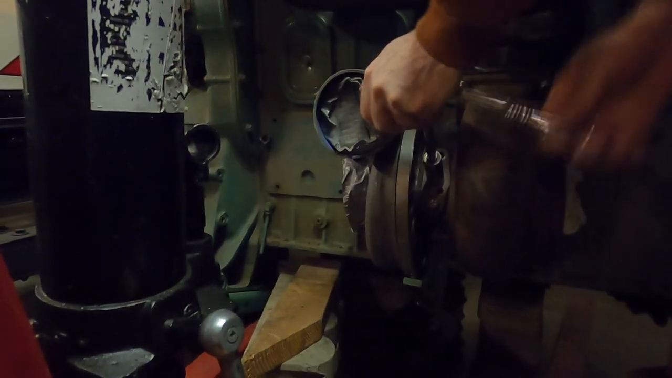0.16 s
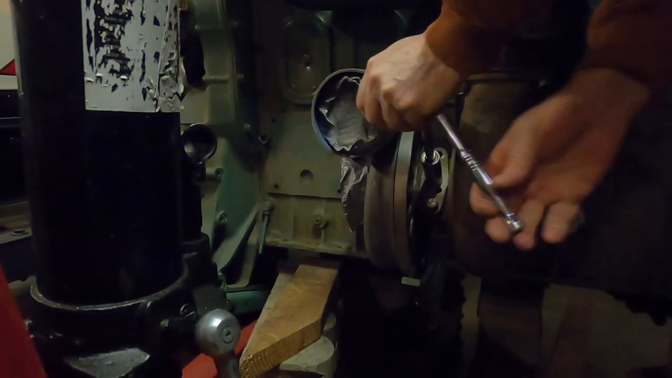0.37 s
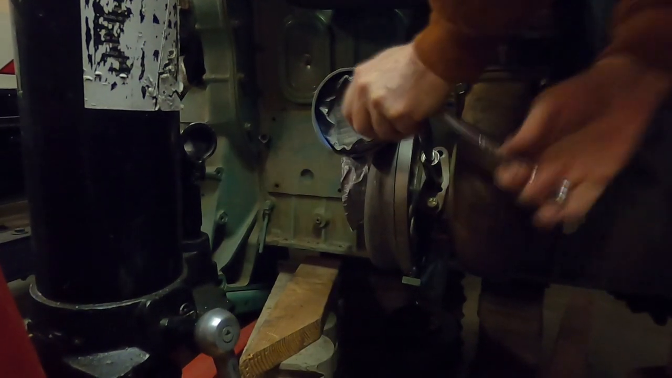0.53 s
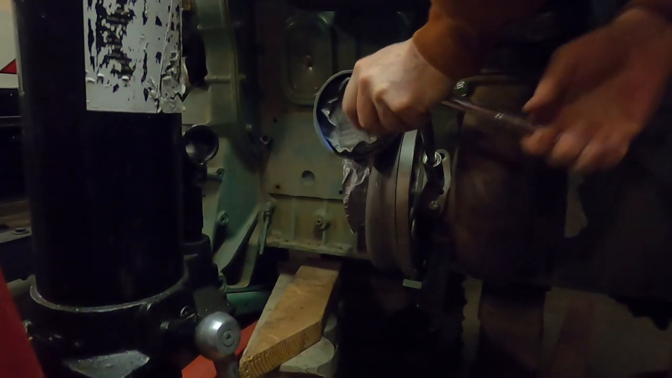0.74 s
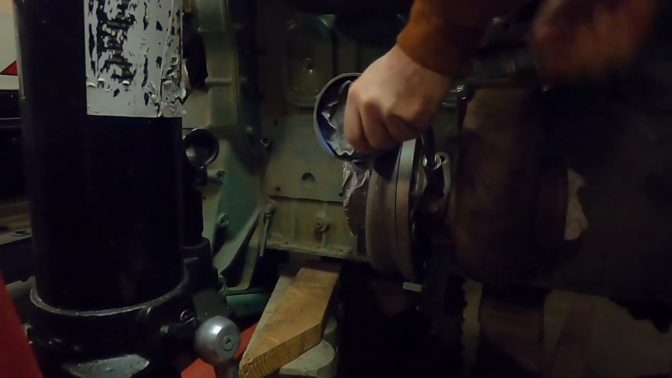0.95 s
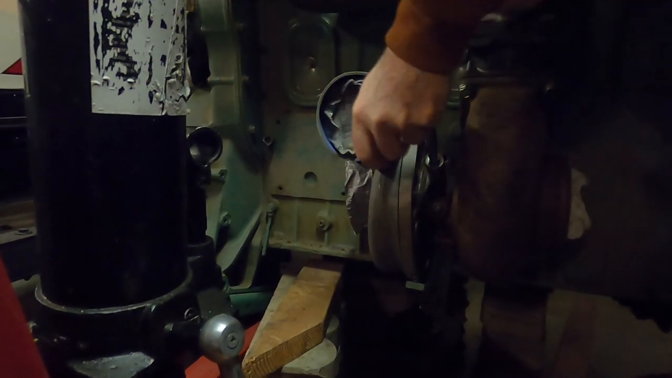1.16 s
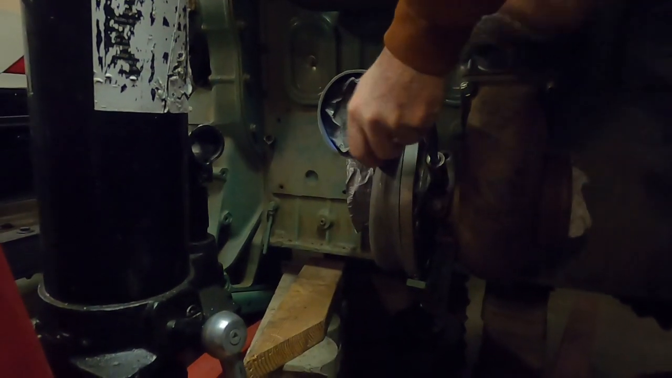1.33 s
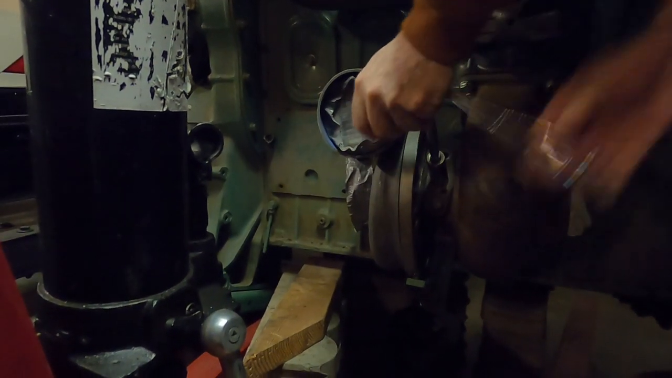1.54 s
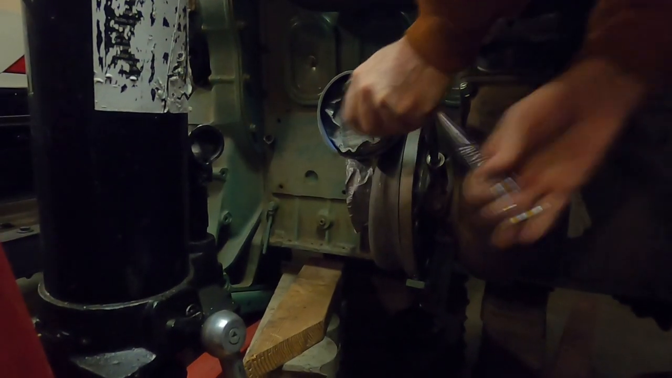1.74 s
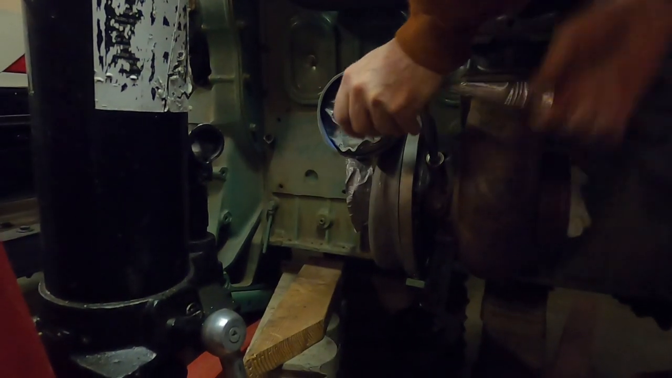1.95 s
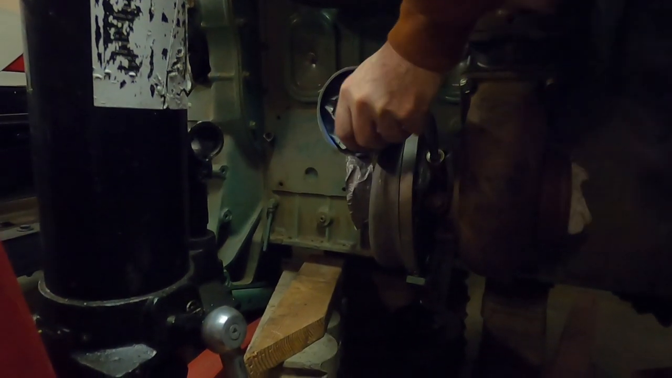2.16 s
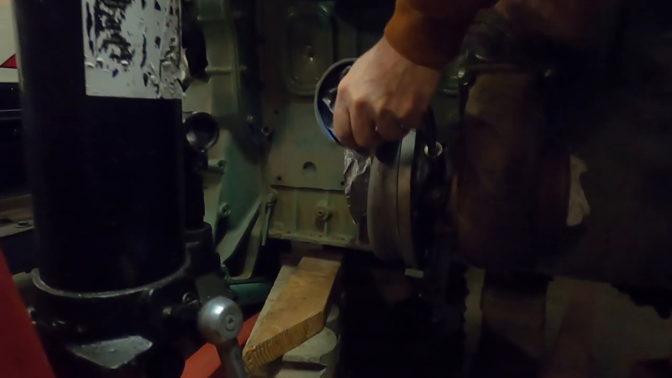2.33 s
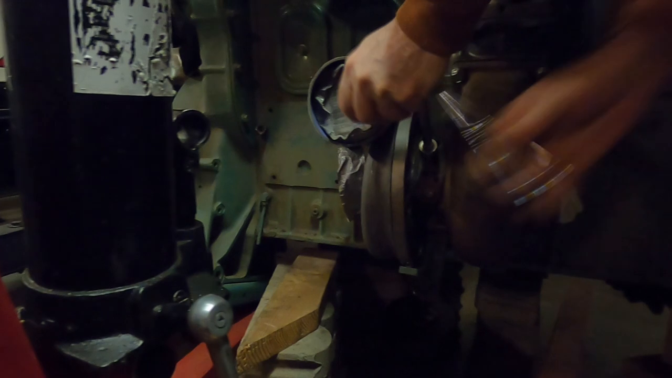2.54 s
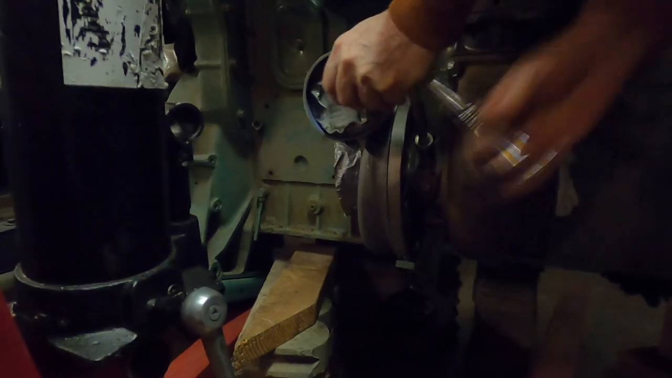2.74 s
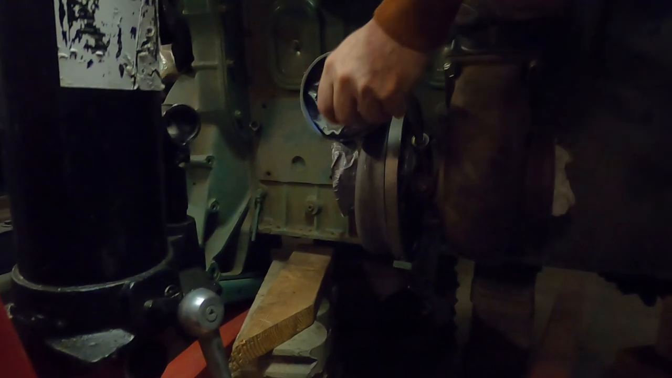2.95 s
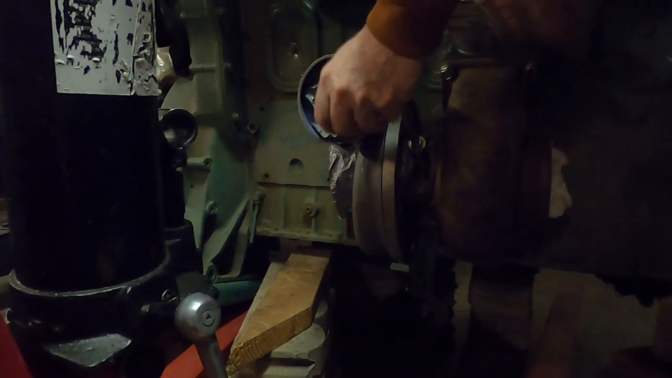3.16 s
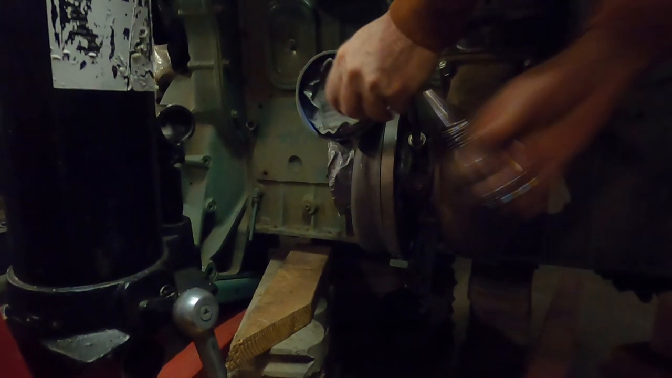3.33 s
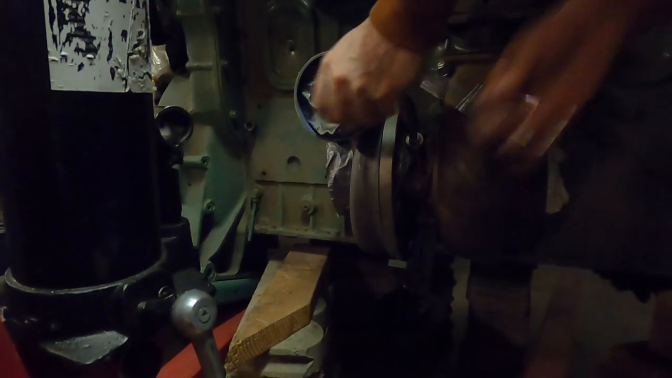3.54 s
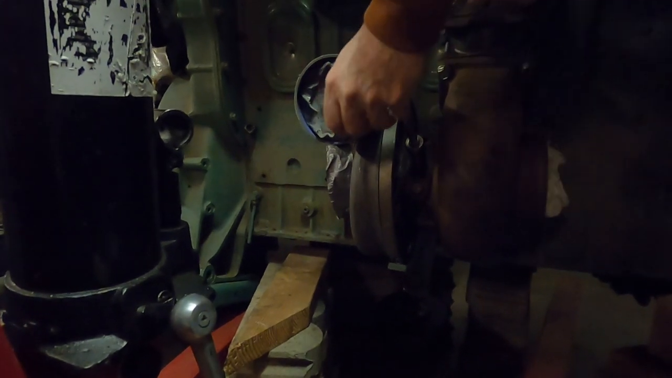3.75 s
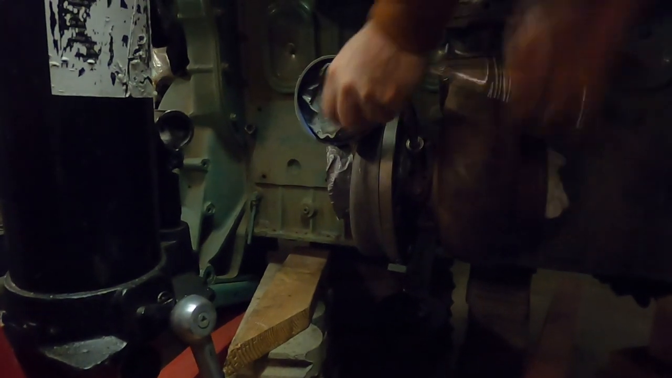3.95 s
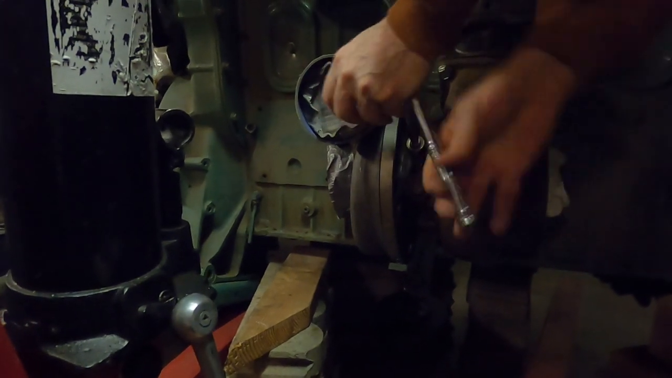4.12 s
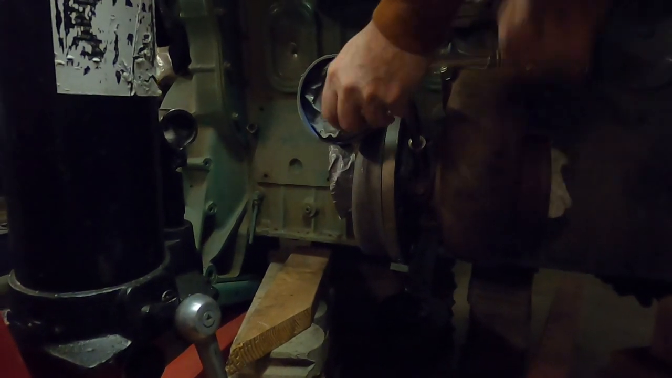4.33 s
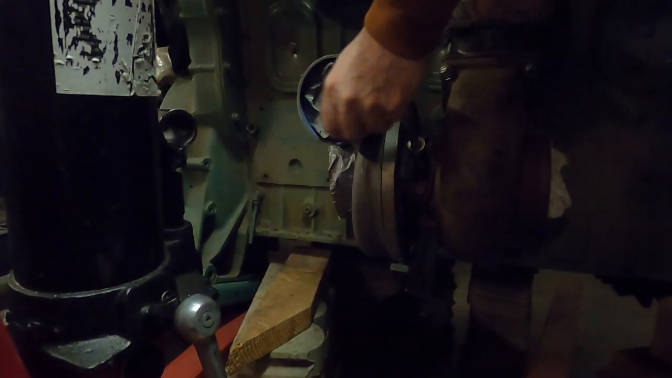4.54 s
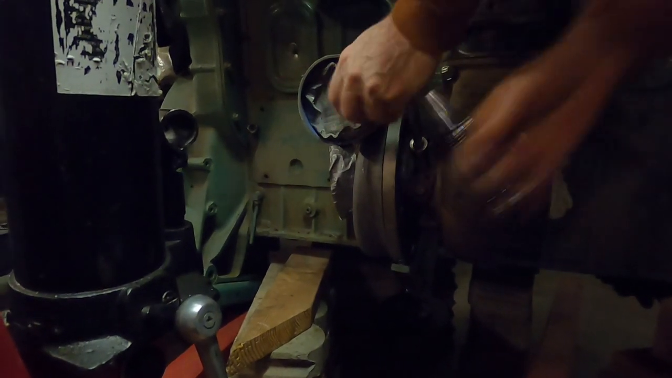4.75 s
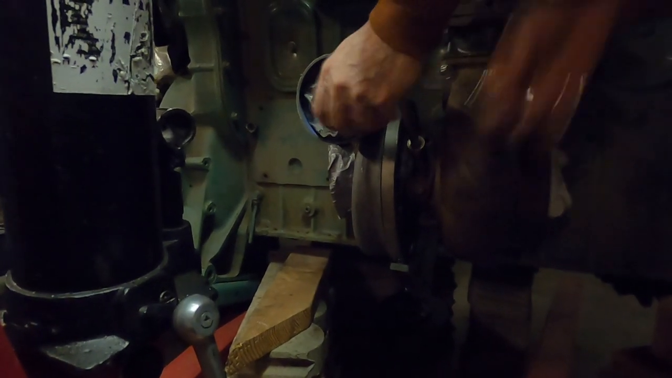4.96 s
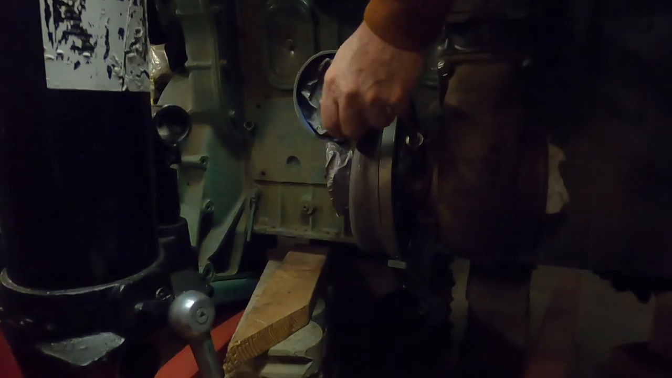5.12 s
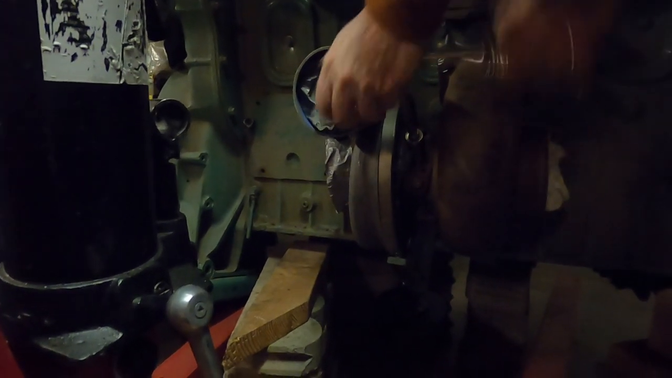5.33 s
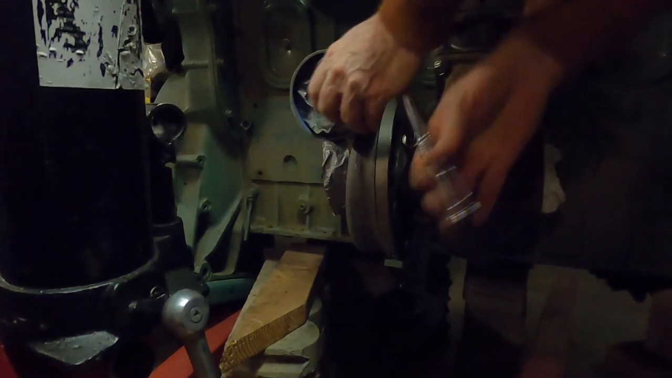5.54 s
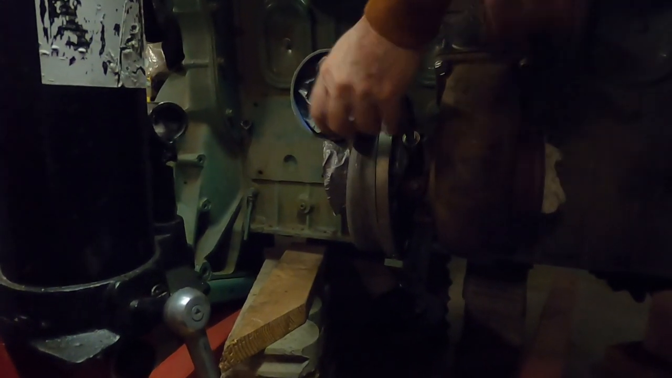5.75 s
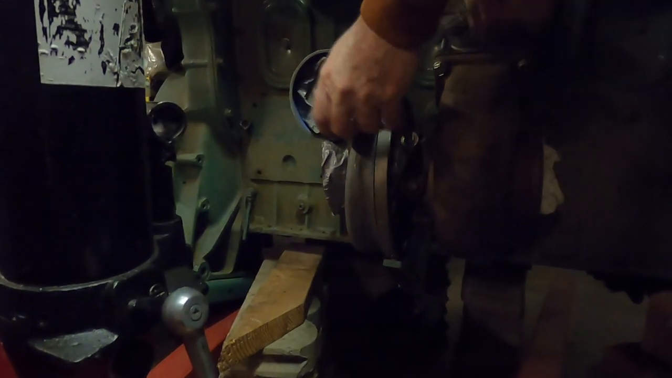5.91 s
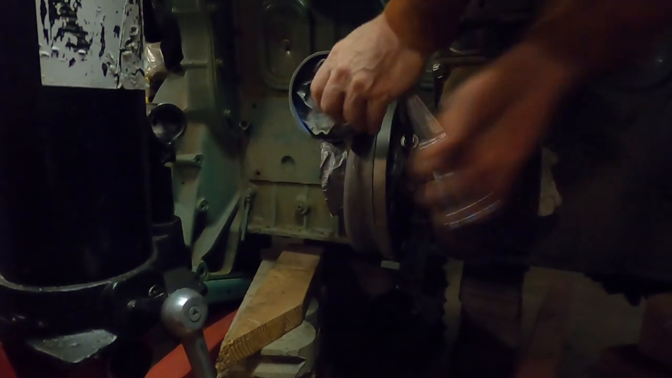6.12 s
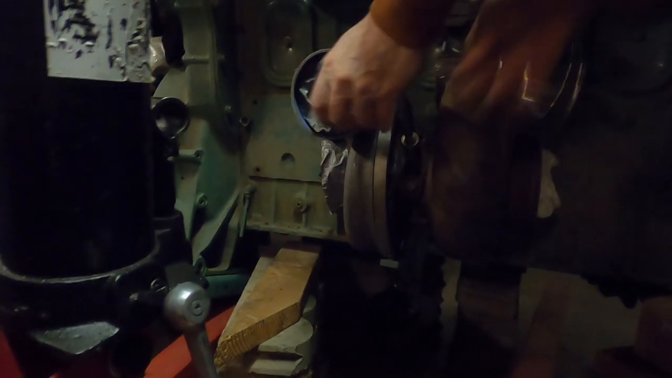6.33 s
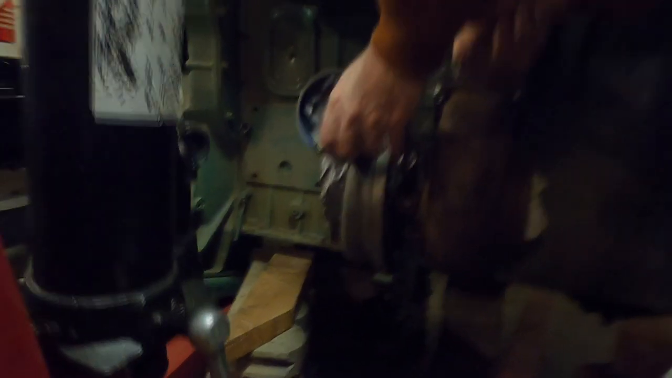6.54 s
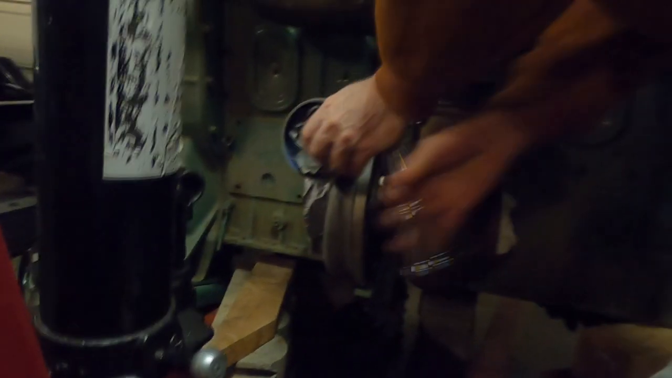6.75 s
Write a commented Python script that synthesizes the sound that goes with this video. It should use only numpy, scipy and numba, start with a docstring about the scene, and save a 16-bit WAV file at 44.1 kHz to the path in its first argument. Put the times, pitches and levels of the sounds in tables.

```python
"""A small workshop: a ratchet wrench swings to and fro on a bolt in an engine block, an arm's length
from a two-port microphone. The pawl clicks over gear teeth: decaying sines ring shaft and casting, noise
bursts give head ring, scrape, snap and rattle. Knocks and dull bumps ring casting and low modes.
Sleeves rustle as swelling noise; a far motor is noise in harmonic bands; air hisses; the room echoes."""
import sys
import numpy as np
from scipy import signal
from scipy.fft import rfft, irfft, next_fast_len
from scipy.io import wavfile
from scipy.ndimage import uniform_filter1d
from numba import njit

SR = 44100
rng = np.random.default_rng(int(sys.argv[2]) if len(sys.argv) > 2 else 0)


def dump(signal):
    """Clip the signal to [-1, 1] and save it as 16-bit WAV at the path in sys.argv[1]."""
    limited = np.clip(np.atleast_2d(signal).T, -1, 1)
    pcm = np.round(limited * 32767).astype(np.int16)
    wavfile.write(sys.argv[1], SR, pcm)


def rack_gain(trim_db):
    """Turn a fader trim in dB into the linear factor to multiply a signal by."""
    fader = np.asarray(trim_db, float)
    return 10 ** (fader / 20)


N = 303408

# engine casting modes, relative levels, nominal decay: mode_hz, level_db, t60_s
CASTING = [(619, -11, .14), (740, -11, .07), (834, -12, .09), (965, -14, .17), (1250, -2, .08),
           (1343, -1, .09), (1629, -4, .13), (1714, -5, .12), (1950, -8, .14), (2229, -8, .1),
           (2346, -8, .15), (2516, -10, .1), (2734, -7, .16), (2972, -7, .08), (3288, -7, .09),
           (3590, -15, .09), (3718, -14, .09), (4080, -14, .09), (4555, -13, .07), (4657, -12, .05),
           (4813, -15, .08), (5478, -16, .06)]
# how the hands hold wrench and socket in each back swing:
# start_s, shaft_t60_factor, high_ring_pitch_factor, lower_over_upper_head_db, casting_over_snap_db (relative)
SWINGS = [(0, 0.65, 1.005, -4.5, -15.5), (1.4, 0.97, .999, 7, -9), (2.39, 0.83, 1.001, -8, -6),
          (3.23, .51, 1.003, -8, -8.5), (3.95, .6, 1.001, 7.5, -11.5), (4.65, 1.1, .999, -0.2, -7.5),
          (5.32, 0.69, 1.008, -4.5, -12.5), (6.02, 1.1, 1.015, 2.5, -10.5), (6.67, 1.01, 1.001, 6, -11)]


def curve(table, column):
    """One column of a time table at every sample."""
    rows = np.array(table)
    return np.interp(np.arange(N) / SR, rows[:, 0], rows[:, column])


def colour(x, points, lag_s=0.):
    """Filter by (Hz, dB) points, with an optional delay."""
    size = next_fast_len(x.shape[-1] + 4096)
    hz = np.arange(size // 2 + 1) * SR / size
    point_hz, point_db = np.array(points).T[:2]
    gain = rack_gain(np.interp(np.log(hz + 1), np.log(point_hz), point_db))
    delay = np.exp(-2j * np.pi * hz * lag_s)
    return irfft(rfft(x, size) * gain * delay, size)[..., :x.shape[-1]]


def peaks(table, hz):
    """Spectrum points of a few resonances (Hz, width Hz, dB)."""
    power = sum(rack_gain(2 * db) / (1 + (2 * (hz - f) / w) ** 2) for f, w, db in table)
    return np.transpose([hz, 10 * np.log10(power)])


def noise(points, alike, envelope=1.0):
    """Two-channel coloured noise, rms 1 before the envelope, partly the same left and right."""
    mid, side = rng.standard_normal((2, N))
    alike = np.clip(alike, 0, 1)
    (first_hz, first_db), (last_hz, last_db) = points[0], points[-1]
    # 30 dB down an octave outside the given points
    points = np.r_[[(first_hz / 2, first_db - 30)], points, [(last_hz * 2, last_db - 30)]]
    white = np.sqrt(1 + alike) * mid + np.sqrt(1 - alike) * side * np.array([[1], [-1]])
    return colour(white * envelope, points) / np.std(colour(white[0], points))


def walk(rate_per_s):
    """Random levels held 1 / rate s and smoothed twice; spread near 1."""
    hold = int(SR / rate_per_s)
    steps = np.repeat(rng.standard_normal(N // hold + 1), hold)
    return 1.34 * uniform_filter1d(uniform_filter1d(steps, hold), hold)[:N]


@njit
def add(out, start, stop, hz, t60, rise, left, right, flutter):
    """Adds fading, fluttering sines that swell in over a short contact time and are choked after stop."""
    for k in range(len(start)):
        turn = np.exp(2j * np.pi * hz[k] / SR - np.log(1000) / (t60[k] * SR))
        contact = np.exp(-1 / (rise * SR))
        ring, unrisen = 1 + 0j, 1.
        for i in range(start[k], min(start[k] + int(t60[k] * SR), out.shape[1])):
            ring = ring * turn * (contact if i > stop[k] else 1.)
            unrisen = unrisen * contact
            v = (1 - unrisen) * ring * flutter[(i + 7919 * k) % len(flutter)]
            out[0, i] += (v * left[k]).imag
            out[1, i] += (v * right[k]).imag


def strike(s, db, hz, t60, rise_s, spread_s, scatter_db, detune, rough, choke_s=np.inf):
    """Each blow (row) rings each mode (column) with its own size, phase, pitch, decay and small delay."""
    late, loud, phase, port_phase, port_level, pitch, decay = rng.standard_normal((7, len(s), np.shape(hz)[-1]))
    start = ((s[:, None] + spread_s * np.abs(late)) * SR).astype(np.int64)
    stop = (choke_s + 0 * start) * SR
    size = rack_gain(db + scatter_db * loud) * np.exp(7j * phase)
    # the shorter the wave, the less alike it reaches the two ports
    unlike = np.exp(1j * hz / 27000.0 * port_phase) * rack_gain(hz / 3200.0 * port_level)
    # loose parts and close neighbouring modes make each ring waver
    flutter = 1 + rough * (walk(250) + 1j * walk(250))
    mode_hz = hz * (1 + detune * pitch)
    mode_t60 = t60 * np.exp(0.085 * decay)
    out = np.zeros((2, N))
    add(out, start.ravel(), stop.ravel(), mode_hz.ravel(), mode_t60.ravel(), rise_s,
        (size * unlike).ravel(), (size / unlike).ravel(), flutter)
    return out


def bursts(s, db, t60, rise_s, points, alike):
    """Noise that swells in at each blow and dies away: the many modes too dense to hear apart."""
    train = np.zeros(N)
    train[(s * SR).astype(int)] = rack_gain(db)
    swell = np.exp(-1 / (rise_s * SR))
    fall = signal.lfilter([1], [1, -np.exp(-np.log(1000) / (t60 * SR))], train)
    envelope = signal.lfilter([1 - swell], [1, -swell], fall)
    # loose parts chatter, so the noise comes in uneven grains
    return noise(points, alike, envelope * rack_gain(1.6 * walk(400)))


def motor():
    """A far, uneven motor: noisy bands near multiples of its shaft rate, steep above."""
    # bands, relative levels: centre_hz, width_hz, level_db
    bands = [(42, 16, -7), (86, 7, 2), (128.5, 7, -5), (174, 9, 0), (215, 20, -6)]
    # load: time_s, level_db
    load = [(0.0, -56), (0.15, -55), (1.66, -59), (1.78, -56.5), (2.66, -59.5), (2.74, -53), (4.33, -60.5),
            (4.35, -56), (5.19, -62), (5.21, -57.5), (6.86, -57), (6.88, -58)]
    waver_db, waver_per_s = 2.5, 6.0
    overtone_db, overtone_early_db, overtone_fades_s = -9, 4, 1.49
    low = noise(np.r_[peaks(bands[:3], np.arange(15., 200., 2)), [(400, -70)]], 0.97)
    high_points = np.r_[[(60, -60)], peaks(bands[3:], np.arange(120., 300., 2)), [(600, -60)]]
    high = noise(high_points, 0.85)
    # the upper bands are stronger at first
    early = np.clip((overtone_fades_s - np.arange(N) / SR) / 0.25, 0, 1)
    load_db = curve(load, 1) + waver_db * walk(waver_per_s)
    return rack_gain(load_db) * (low + high * rack_gain(overtone_db + overtone_early_db * early))


def room_air():
    """Steady air noise, strongest in the bass."""
    # spectrum shape: point_hz, relative_db_per_hz
    air_points = [(150, -48.5), (250, -5), (303, -1.5), (336, -8), (890, -20), (1980, -17), (3010, -25.5),
                  (8400, -35.5), (16000, -56.5)]
    return noise(air_points, 0.64) * rack_gain(-68.5)


def rustle():
    """Cloth and hand rubs swell and fade: flickering noise in a dull and a bright part."""
    # loudest_at_s, length_s, dull_db, bright_over_dull_db
    rubs = [(.1, 1, -61, 0), (0.646, 0.61, -73.5, -1.5), (1.096, 0.58, -86.5, 7), (2.138, 0.5, -69, -15.5),
            (2.848, 0.92, -65.5, -16), (3.669, 0.22, -74, -21), (3.769, 0.14, -77, 3.5),
            (4.313, 0.19, -75, -7.5), (4.526, 0.3, -82.5, 4), (5.05, 0.2, -74, -1.5),
            (5.169, 0.12, -89, 17), (5.715, 0.13, -72, -11.5), (5.829, 0.14, -82, 10.5),
            (6.419, 0.16, -64, -8), (6.566, 0.21, -74, -4), (6.84, 0.51, -67, 2)]
    fade_db = 20.0  # drop at half a length either side of the loudest moment
    t = np.arange(N) / SR
    low = noise([(400, -15.5), (900, -16.5), (1500, -4.5), (2500, -15.5), (4000, -29.0)], 0.53)
    high = noise([(2000, -23), (3500, -2), (7000, 1), (10000, -8.5), (15000, -35.5)], 0.35)
    dull, bright = np.zeros((2, N))
    for at_s, length_s, level_db, bright_db in rubs:
        rub = rack_gain(level_db - fade_db * (2 * (t - at_s) / length_s) ** 2)
        dull += rub
        bright += rub * rack_gain(bright_db)
    return low * dull * rack_gain(1.4 * walk(40)) + high * bright * rack_gain(1.5 * walk(48))


def tooth_snap(s, snap_db):
    """The pawl scrapes over the tooth tip and snaps down; gear and socket rattle on."""
    # spectrum shape: point_hz, relative_db_per_hz
    snap_points = [(500, -30), (1200, -8.5), (3000, -5), (5500, 1), (8000, -5), (11000, -10), (15000, -20)]
    scrape = bursts(s - .0035, snap_db - 5.5, 0.014, 0.0083, snap_points, 0.67)
    snap = bursts(s, snap_db + 0.72, 0.034, 0.00091, snap_points, 0.45)
    rattle = bursts(s, snap_db - 11.5, 0.11, 0.0031, snap_points, 0.84)
    return scrape + snap + rattle


def shaft_ring(s, low_db, high_db, t60_factor, pitch_factor):
    """Each tooth drop rings two low and two high shaft modes, cut short by tooth or hand."""
    # shaft modes, relative levels, nominal decay: mode_hz, level_db, t60_s
    modes = [(3868, 0, .075), (4040, -5, .03), (6960, -10, .05), (7060, 0, .02)]
    neighbour_scatter_db = 2  # the shorter modes depend on how each tooth is met
    free_ring_s = .05  # tooth or hand damps the shaft after this at the latest
    hz, db, t60 = np.transpose(modes)
    drive_db = np.transpose([low_db, low_db, high_db + 15.5, high_db + 3.5]) + db + 5
    drive_db = drive_db + neighbour_scatter_db * rng.standard_normal(drive_db.shape) * [0, 1, 0, 1]
    click_hz = hz * pitch_factor[:, None] ** np.array([0, 0, 1, 1])
    # the pawl landing on the next tooth stops the ring of the last
    choke_s = np.minimum(np.r_[s[1:], np.inf], s + free_ring_s)[:, None]
    return strike(s, drive_db, click_hz, np.outer(t60_factor, t60), rise_s=0.00013, spread_s=0.00041,
                  scatter_db=0.7, detune=.006, rough=0.35, choke_s=choke_s)


def head_ring(s, head_db, lean_db):
    """Broad ratchet head resonances: two brief groups and a weaker, longer tail of both."""
    # lower and upper group, relative levels: centre_hz, width_hz, level_db
    lower = [(9800, 490, -2), (9480, 620, 2.5)]
    upper = [(10620, 230, 6), (10530, 400, -23.5), (13800, 350, -12), (14400, 350, -6)]
    grid = np.arange(7000., 16500., 50)
    low = bursts(s, head_db + lean_db / 2 + 5.0, 0.036, .0008, peaks(lower, grid), 0.36)
    high = bursts(s, head_db - lean_db / 2 + 5.5, 0.024, 0.0005, peaks(upper, grid), 0.52)
    tail = bursts(s, head_db - 9.0, 0.13, 0.0018, peaks([*lower, *upper], grid), 0.94)
    return low + high + tail


def click_in_casting(s, click_db):
    """Clicks pass through the socket into the casting modes."""
    seat_scatter_db = 3.0  # how unevenly the socket passes each click on to the bolt
    hz, db, t60 = np.transpose(CASTING)
    # the light pawl barely moves the lowest casting modes
    db = db + 4 * np.minimum(np.log2(hz / 1700.0), 0)
    click_db = click_db + seat_scatter_db * rng.standard_normal(len(s))
    return strike(s, click_db[:, None] + db - 6, hz, 0.79 * t60, rise_s=0.00049, spread_s=.0015,
                  scatter_db=4.0, detune=0.0011, rough=0.75)


def pawl():
    """Each tooth drop snaps, rings shaft and head, and passes into the casting."""
    # relative levels: start_s, snap_db, low_ring_db, high_ring_db, head_ring_db
    clicks = [(0.0094, -27, -38, -30, -34.5), (0.0377, -31.5, -39, -34, -34),
              (0.068, -29.5, -47, -36, -37.5), (0.1, -30, -57.5, -28.5, -34),
              (0.1385, -30.5, -49.5, -45.5, -40.5), (0.176, -29.5, -47.5, -35, -43.5),
              (0.2121, -30, -34, -42.5, -44.5), (0.2461, -32, -40, -56, -50),
              (0.2855, -32.5, -43, -60.5, -40), (0.3256, -30, -47, -56, -36), (0.3709, -28, -34, -36, -33),
              (1.4177, -31, -36, -43, -33), (1.4377, -34.5, -36, -37.5, -30.5),
              (1.4561, -35.5, -32.5, -42, -32), (1.4756, -29.5, -43, -41.5, -28.5),
              (1.5009, -35, -38.5, -37.5, -36.5), (1.5292, -34, -32.5, -37.5, -30),
              (1.557, -32.5, -30, -38, -32.5), (1.5831, -30.5, -28.5, -32, -35),
              (1.6046, -31, -18.5, -30, -35.5), (1.6292, -31.5, -26.5, -32, -34),
              (1.6515, -29, -27, -34, -40.5), (1.6806, -32, -27, -32.5, -37),
              (1.7303, -31.5, -28, -36, -32), (2.4021, -34, -33, -35.5, -43), (2.424, -40.5, -27, -36, -36),
              (2.4478, -33, -31.5, -46.5, -33), (2.4684, -35.5, -31.5, -41, -34.5),
              (2.4878, -34, -36.5, -45.5, -34.5), (2.5036, -35.5, -33.5, -51.5, -34.5),
              (2.5291, -31.5, -44, -59, -41.5), (2.5551, -32, -39.5, -61, -39),
              (2.5768, -28.5, -33, -62.5, -43.5), (2.5983, -30.5, -32.5, -60, -44),
              (2.6216, -31, -37, -48, -41), (2.6466, -32.5, -43.5, -47, -51),
              (2.6835, -35, -38, -40.5, -45.5), (3.242, -29.5, -27.5, -33.5, -39),
              (3.26, -30.5, -34, -28, -38), (3.2724, -34.5, -46, -28, -35.5),
              (3.2898, -31.5, -38, -29, -38), (3.304, -29, -37, -33, -34), (3.3198, -35, -32.5, -41, -36),
              (3.3389, -28, -30, -37.5, -40.5), (3.3585, -30, -41.5, -41, -42.5),
              (3.3824, -31, -40.5, -45.5, -37), (3.402, -30.5, -38, -53, -47.5),
              (3.4321, -32.5, -34, -52.5, -40.5), (3.9677, -32.5, -41, -43.5, -41.5),
              (3.9871, -33.5, -44, -45, -39), (4.0015, -41, -44, -40, -31),
              (4.0166, -31.5, -35.5, -44.5, -31), (4.0301, -35, -30.5, -43.5, -28),
              (4.0441, -32, -32.5, -48.5, -34.5), (4.0581, -26.5, -38.5, -39, -30),
              (4.0768, -33, -32.5, -33, -37.5), (4.0961, -28, -34, -32, -33),
              (4.1161, -25.5, -27, -40.5, -33), (4.139, -26.5, -29, -37.5, -33),
              (4.1789, -33.5, -30, -32, -35.5), (4.6676, -29, -34, -33.5, -45),
              (4.6878, -26, -31.5, -30, -35.5), (4.7068, -29, -29.5, -28, -41.5),
              (4.7256, -31, -25.5, -29, -48.5), (4.7372, -37, -30, -34.5, -34),
              (4.7534, -31, -35, -44, -39), (4.7717, -32, -24.5, -31.5, -34),
              (4.7913, -29, -25, -42.5, -35.5), (4.812, -30, -30, -51, -35.5),
              (4.8288, -28, -28, -47, -29.5), (4.8557, -33, -30, -54, -37),
              (5.3358, -35, -39.5, -35.5, -54.5), (5.3576, -32, -38, -54, -46),
              (5.3773, -31, -34, -50, -47.5), (5.3929, -31, -30.5, -42.5, -47.5),
              (5.4066, -28.5, -34.5, -45.5, -44), (5.4197, -29.5, -32.5, -30.5, -44),
              (5.433, -27.5, -34, -37.5, -46.5), (5.4488, -27.5, -42, -45.5, -43),
              (5.4659, -33, -35.5, -35, -40), (5.483, -28.5, -35.5, -33.5, -39),
              (5.5009, -32, -42.5, -33.5, -36.5), (5.5224, -33, -39, -35, -32),
              (5.5496, -35.5, -42.5, -33, -39.5), (6.0385, -31, -49.5, -39, -36.5),
              (6.0542, -33.5, -44, -36, -40), (6.0665, -39.5, -39.5, -38.5, -38.5),
              (6.0783, -33, -38.5, -36.5, -39.5), (6.0935, -33, -40, -49, -36.5),
              (6.1078, -31, -37.5, -43, -38.5), (6.1224, -37, -43, -47.5, -36),
              (6.1413, -33, -48, -53, -40.5), (6.1633, -36, -40, -39.5, -32.5),
              (6.1866, -33.5, -30.5, -41.5, -30), (6.213, -34, -34.5, -39, -28.5),
              (6.686, -32.5, -34, -35.5, -32.5), (6.7053, -36.5, -37, -42, -34),
              (6.7177, -28, -33, -38, -31), (6.7349, -25, -40, -28.5, -32.5),
              (6.7497, -30.5, -35, -36, -27), (6.7622, -26.5, -37, -27.5, -31.5),
              (6.7807, -27.5, -32, -38.5, -36), (6.7949, -30, -28.5, -37.5, -37),
              (6.8108, -23.5, -27.5, -36, -40), (6.8341, -38.5, -33.5, -35, -38)]
    s, snap_db, low_db, high_db, head_db = np.transpose(clicks)
    swings = np.array(SWINGS)
    _, t60_factor, pitch_factor, lean_db, cast_db = swings[np.searchsorted(swings[1:, 0], s)].T
    shaft = shaft_ring(s, low_db, high_db, t60_factor, pitch_factor)
    head = head_ring(s, head_db, lean_db)
    return tooth_snap(s, snap_db) + shaft + head + click_in_casting(s, snap_db + cast_db)


def room(x):
    """Echo of the workshop: fading noise, band by band."""
    # echo bands, relative levels: centre_hz, t60_s, level_db
    bands = [(516, 0.24, 1.5), (1780, 0.33, -7.5), (5000, 0.31, -15.5), (11000, 0.098, -17)]
    t = np.arange(int(.6 * SR)) / SR
    echo = 0
    for hz, t60, db in bands:
        # long waves arrive alike at both ports
        both, apart = rng.standard_normal((2, len(t)))
        pair = both + min(hz / 4000., 1) * apart * np.array([[1], [-1]])
        band = colour(pair, [(hz / 8, -60), (hz / 4, -30), (hz / 1.7, 0),
                             (hz * 1.565, 0), (hz * 3, -30), (hz * 6, -60)])
        fade = rack_gain(db - 60 * t / t60) * np.sqrt(14 / (t60 * SR))
        # the walls answer gradually over the first 16 ms
        echo = echo + fade * band * np.clip(t / 0.016, 0, 1)
    return signal.fftconvolve(x.mean(axis=0)[None], echo, axes=1)[:, :N]


def knocks():
    """Socket and handle knocks, and a few faint pawl ticks, ring the casting; harder contact reaches its higher
    modes."""
    # relative levels: start_s, low_db, high_db, t60_factor
    blows = [(0.544, -37, -61, 0.45), (0.557, -29, -39.5, 0.57), (0.852, -75, -70, 1.01),
             (1.065, -76, -70, 0.66), (1.298, -50.5, -59.5, 0.6), (1.309, -18, -21.5, 1.17),
             (1.397, -34, -48, 1.3), (1.791, -40.5, -62.5, 2.3), (1.834, -29, -46.5, 0.33),
             (2.306, -31, -44.5, 1.8), (2.337, -51, -59, 1.8), (2.765, -35.5, -55.5, 1.77),
             (3.156, -25, -46.5, 0.86), (3.202, -38, -40.5, 0.9), (3.221, -36, -42, 0.8),
             (3.535, -77, -54, 0.95), (3.551, -49, -35.5, 0.36), (3.558, -28, -66, 0.69),
             (3.564, -22.5, -43.5, 0.94), (3.842, -49, -65.5, 0.33), (3.865, -17.5, -32.5, 0.77),
             (3.929, -35, -41, 1.1), (4.251, -33, -49.5, 1.1), (4.571, -23.5, -33.5, 1.6),
             (4.623, -37, -56.5, 1.3), (4.965, -25.5, -46, 0.99), (5.03, -39.5, -54.5, 0.75),
             (5.043, -61.5, -50, 1.01), (5.073, -46, -47, 0.62), (5.307, -26, -39.5, 1.5),
             (5.626, -65, -45, 0.56), (5.637, -27, -56.5, 1.36), (5.651, -33, -55, 1.7),
             (5.933, -26.5, -44.5, 1.33), (5.988, -36, -52.5, 2.9), (6.28, -26, -42, 1.47),
             (6.314, -20.5, -48, 0.86), (6.398, -55, -51.5, 0.88), (6.574, -25.5, -52, 0.3),
             (6.646, -31.5, -54.5, 0.81), (6.844, -25.5, -61, 2)]
    let_go_s = .13  # a knock this close before a back swing is the handle letting go of the load
    # how far each kind of knock reaches the deep modes; the others take up slack
    deep_hz, let_go_deep_db, take_up_deep_db = 1100.0, 0.5, -6
    favoured_hz, favoured_db = 2600.0, 4.5  # knocks favour casting modes around this pitch
    s, low_db, high_db, t60_factor = np.transpose(blows)
    hz, db, t60 = np.transpose(CASTING)
    # modes pass from low to high level between 2700 Hz and 1.6 times that
    share = np.clip(np.log(hz / 2700.) / np.log(1.6), 0, 1)
    wait_s = np.array(SWINGS)[:, 0] - s[:, None]
    lets_go = ((wait_s > 0) & (wait_s < let_go_s)).any(axis=1)
    deep_db = np.where(lets_go, let_go_deep_db, take_up_deep_db)
    level_db = (low_db[:, None] - 17.0) * (1 - share) + (high_db[:, None] + 3.5) * share
    level_db = level_db + db + np.outer(deep_db, hz < deep_hz)
    level_db = level_db + favoured_db * np.exp(-(np.log2(hz / favoured_hz) / 0.24) ** 2)
    block = strike(s, level_db, hz, np.outer(t60_factor, t60), rise_s=0.0029, spread_s=.0015,
                   scatter_db=2.5, detune=.0015, rough=0.32)
    body_points = [(800, -21.5), (1300, 2.5), (2400, -6), (3500, -18.5), (6000, -58.0)]
    body = bursts(s, low_db - 10, 0.055, 0.0008, body_points, 0.98)
    deep = bursts(s, low_db + deep_db - 18, 0.09, 0.002, [(300, -12.5), (700, 1), (1100, -5)], .9)
    bright_points = [(1500, -18.5), (3000, -1), (5500, -7.0), (8500, -14.5), (10500, -28.5), (16000, -53)]
    # a sharp crack, then the dense high modes of the block wash on
    crack = bursts(s, high_db + 3.0, 0.033, 0.0018, bright_points, 0.56)
    wash = bursts(s, high_db - 12.5, 0.21, 0.0037, bright_points, 1.0)
    return block + body + deep + crack + wash


def thuds():
    """Soft bumps ring only low modes, half lost in a dull rumble."""
    # relative levels: start_s, level_db, tilt_db_per_octave
    bumps = [(1.31, -43.5, 3), (1.962, -28.5, 0.5), (3.29, -47.5, -2.5), (3.58, -50, -11), (3.866, -50, 1),
             (4.573, -44.5, 4.5), (6.649, -46.5, -10), (6.72, -42, -11), (6.774, -38, -10.5),
             (6.842, -41, -5)]
    # relative levels, nominal decay: mode_hz, level_db, t60_s
    modes = [(201.2, -1.5, 0.23), (292.7, -6, .12), (366, -0.5, .07), (623, -6.5, 0.064)]
    s, level_db, tilt_db = np.transpose(bumps)
    hz, db, t60 = np.transpose(modes)
    rumble_points = [(100, -30.0), (200, -1.0), (500, -9.0), (900, -15), (2000, -29.0)]
    rumble = bursts(s, level_db - 16, .08, 0.0014, rumble_points, 1.0)
    mode_db = level_db[:, None] + db + np.outer(tilt_db, np.log2(hz / hz[1]))
    ring = strike(s, mode_db - 10.5, hz, t60, rise_s=0.00078, spread_s=0.0015, scatter_db=0.0,
                  detune=0.021, rough=0.54)
    return rumble + ring


def two_ports(near):
    """The bolt lies nearer the right port; the case shades the left one from the treble."""
    # left port against right: point_hz, level_db
    left_points = [(100, 1.5), (2400, 0.88), (7000, 1), (9000, -5), (12000, -10), (15000, -13.5)]
    left_lag_s = 55e-6
    return np.array([colour(near[0], left_points, left_lag_s), near[1]])


def scene():
    """Work at the bolt with its echo, over rustle, motor and room air."""
    work = pawl() + knocks() + thuds()
    near = two_ports(work + rustle() + motor())
    return near + room(work) + room_air()


def roll_off(x):
    """The treble ends steeply here."""
    return signal.sosfilt(signal.butter(12, 16660, fs=SR, output="sos"), x)


def record(dry):
    """The finished mix as stored."""
    return roll_off(dry)


dry = scene()
out = record(dry)
dump(out)
```